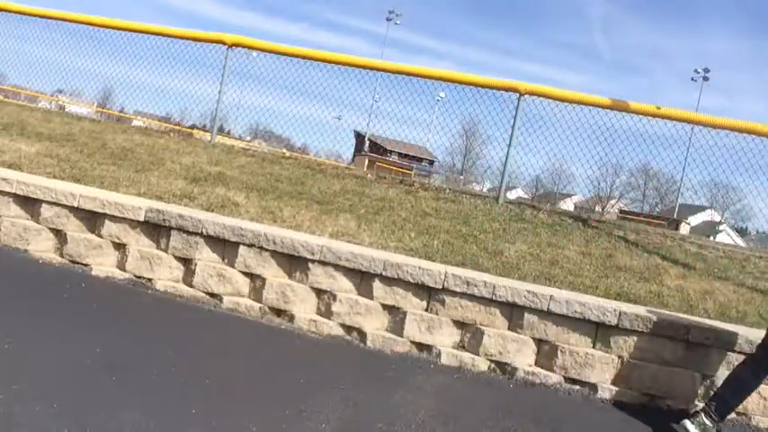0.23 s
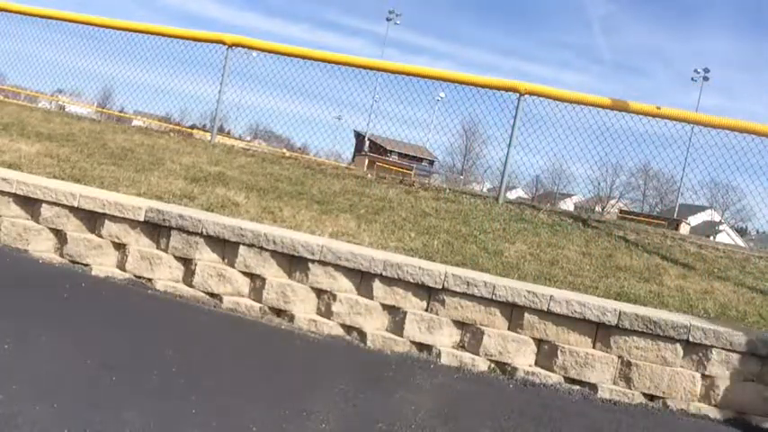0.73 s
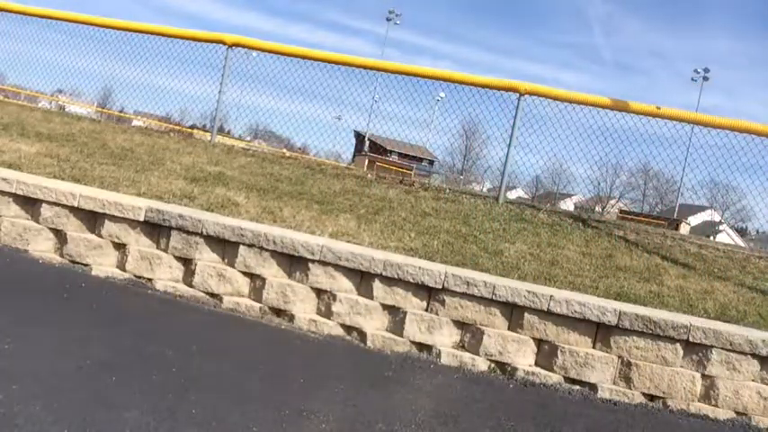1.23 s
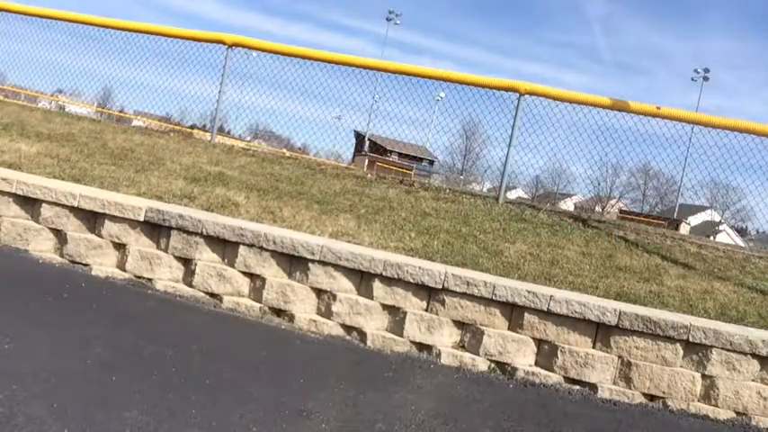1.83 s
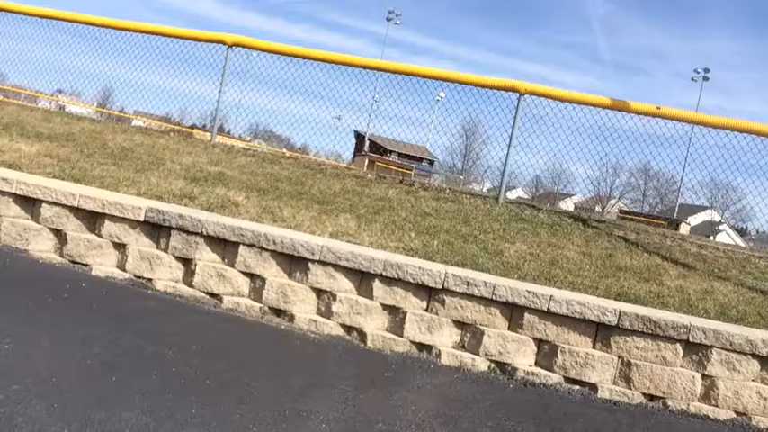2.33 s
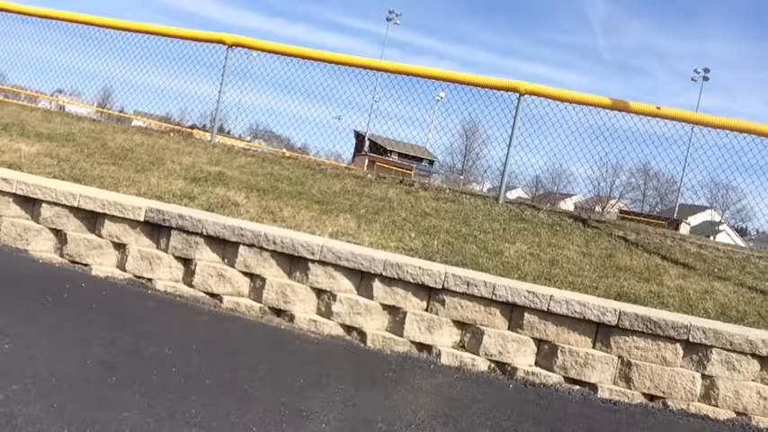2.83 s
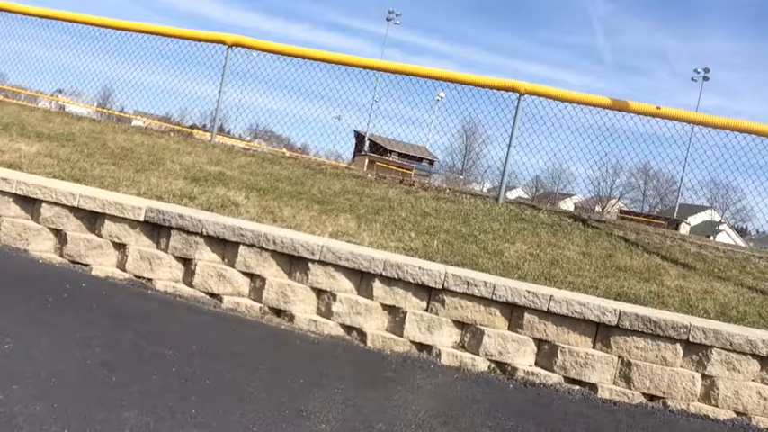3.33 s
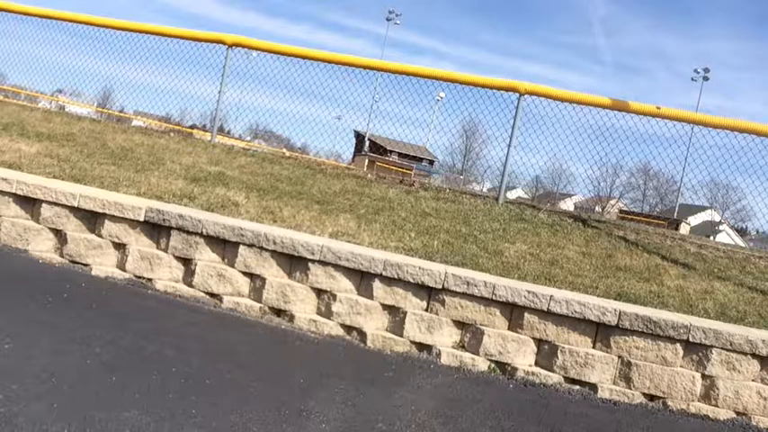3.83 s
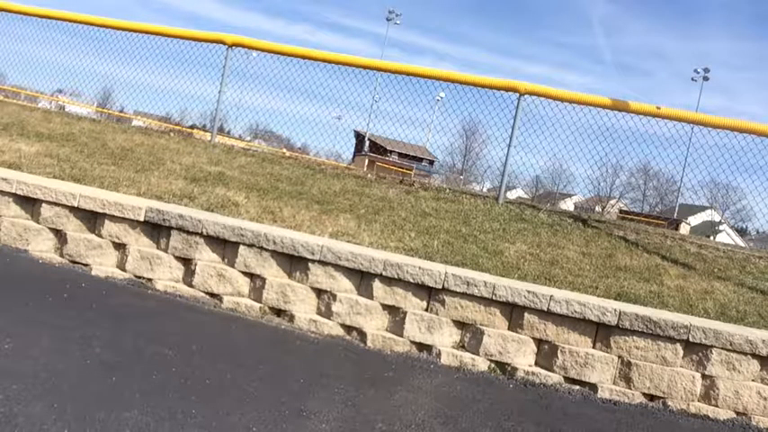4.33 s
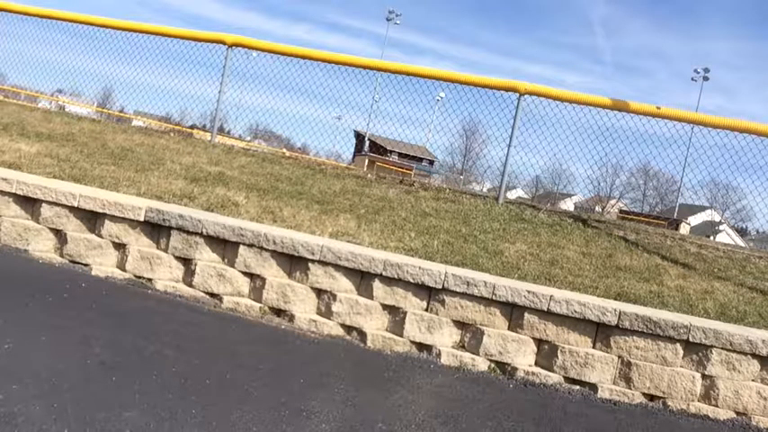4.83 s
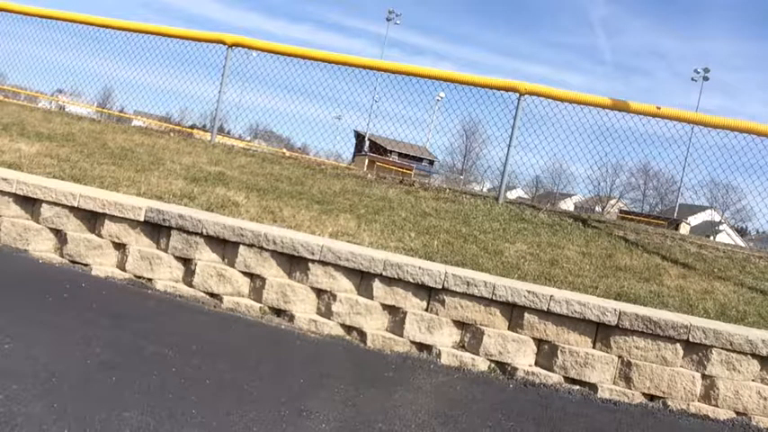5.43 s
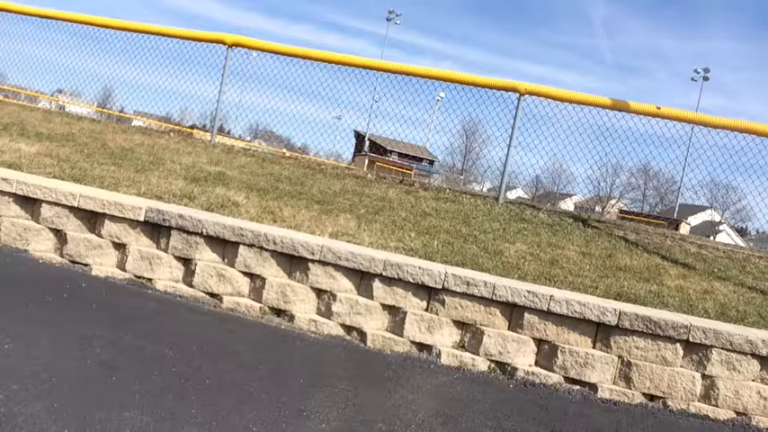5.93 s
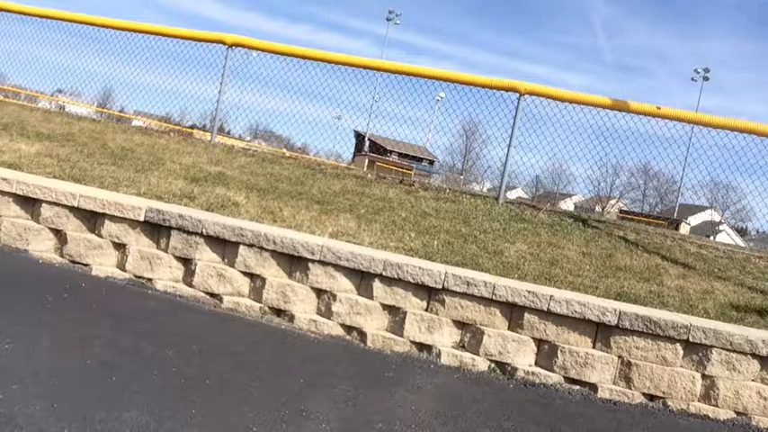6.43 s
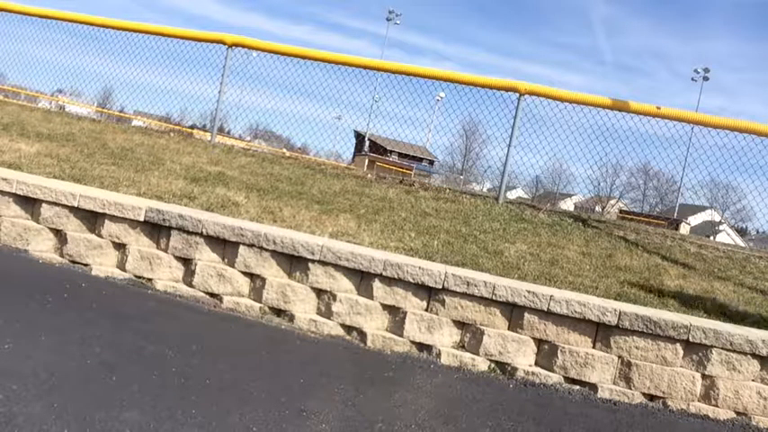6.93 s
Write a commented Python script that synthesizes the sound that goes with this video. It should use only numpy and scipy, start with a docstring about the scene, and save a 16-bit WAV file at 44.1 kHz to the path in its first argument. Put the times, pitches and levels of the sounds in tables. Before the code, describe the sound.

A kick scooter rolls softly past on rough asphalt with a faint whirr and a few ticks. Its deck then smacks down nearby, loud and sharp with a short metallic ring, bouncing and briefly skidding. Light knocks and jingling loose parts follow further off. Wind rumbles on the small microphone throughout, with frequent low pops after the smack, over faint outdoor hiss and distant traffic.

```python
"""Wind rumbles on a small microphone over faint outdoor hiss and far traffic as a kick scooter rolls past.
Stones in the asphalt drum its frame and stir a whirr. The deck smacks down nearby, ringing with the tube,
bounces and skids; light knocks and jingling loose parts follow further off, with faint echoes.
Eddies buffet the microphone with low pops. A faint far whine comes and goes near the end."""
import sys
import numpy as np
from scipy import signal
from scipy.fft import rfft, irfft
from scipy.io import wavfile
from scipy.ndimage import uniform_filter1d

SR = 44100
rng = np.random.default_rng(int(sys.argv[2]) if len(sys.argv) > 2 else 0)


def store_wav(level_fs):
    """Save 16-bit WAV to argv[1]."""
    pcm = np.round(np.clip(np.atleast_2d(level_fs), -1, 1) * 32767)
    wavfile.write(sys.argv[1], SR, pcm.T.astype(np.int16))


N = 317079


def gain_of(db):
    return 10 ** (np.asarray(db) / 20)

def decay(t, t60_s):
    return gain_of(-60 * t / t60_s)

def unit_rms(x):
    return x / np.sqrt(np.mean(x ** 2) + 1e-20)

def unit_peak(x):
    return x / (abs(x).max() + 1e-12)

def add(mix, start_s, sound):
    part = mix[round(start_s * SR):][:len(sound)]
    part += sound[:len(part)]

def curves(rows):
    """Each column after time_s, read at every sample."""
    time_s, *columns = np.transpose(rows)
    return [np.interp(np.arange(N) / SR, time_s, column) for column in columns]

def coloured(x, spectrum):
    """Signal shaped by (freq_hz, gain_db) points, rms 1."""
    bins_hz = np.fft.rfftfreq(len(x), 1 / SR)
    freq_hz, gain_db = np.transpose(spectrum)
    shape_db = np.interp(np.log(bins_hz + 1), np.log(freq_hz + 1), gain_db)
    return unit_rms(irfft(rfft(x) * gain_of(shape_db), len(x)))

def resonate(x, centre_hz, width_hz):
    pole = np.exp((2j * centre_hz - width_hz) * np.pi / SR)
    return 2 * signal.lfilter([1 - abs(pole)], [1, -pole], x).real

def wander(span_s):
    """Noise smoothed over span_s, rms 1."""
    size = max(round(span_s * SR), 2)
    return unit_rms(uniform_filter1d(uniform_filter1d(rng.standard_normal(N), size), size))

def swells(peak_s, peak_db, rise_db_per_s, fall_db_per_s):
    """Summed envelopes that climb and drop at steady dB rates."""
    t = np.arange(0, N + 128, 64) / SR
    late_s = t[:, None] - np.asarray(peak_s)
    slopes_db = np.minimum(rise_db_per_s * late_s, -fall_db_per_s * late_s)
    return np.interp(np.arange(N) / SR, t, gain_of(peak_db + slopes_db).sum(axis=1))


# time_s, low_db, upper_db
WIND_LEVELS = [(0, -50.5, -65.5), (.1, -64, -100), (.33, -48.5, -64), (.5, -59, -79.5), (1.15, -58, -76.5),
               (1.8, -56, -86.5), (2.0, -42, -61.5), (2.14, -46.5, -62.5), (2.45, -52, -69),
               (2.7, -66, -90), (2.77, -69, -105), (2.9, -42.5, -46), (3.12, -53, -46), (3.17, -52.5, -77),
               (3.55, -42.5, -46.5), (3.72, -52.5, -87), (4.1, -42.5, -56), (4.2, -82, -85.5),
               (4.5, -48.5, -77), (4.8, -53.5, -80), (5.0, -44, -49), (5.22, -50, -68.5),
               (5.66, -52.5, -89.5), (5.9, -41, -51), (6.03, -61, -66.5), (6.27, -45, -64.5),
               (6.38, -50.5, -51.5), (6.5, -58.5, -81), (6.65, -51, -66), (7.19, -54, -72.5)]
# freq_hz, gain_db
WIND_LOW_SPECTRUM = [(20, -42.5), (40, -8), (60, 1), (123, 1), (226, -5), (343, -22), (500, -38),
                     (1500, -120)]
WIND_UPPER_SPECTRUM = [(120, -45), (220, 1), (290, -1.5), (400, -5), (550, -17), (750, -38.5), (1000, -55),
                       (2500, -130)]
# time_s, pop_db, pop_hz, edge_rel_db, swell_low_db, swell_upper_db
BUFFETS = [(1.135, -38.5, 96, -41, -67, -83), (2.182, -41, 230, -4, -46, -64),
           (2.411, -29.5, 231, -38.5, -77, -56.5), (2.571, -25, 157, -41, -48, -52),
           (2.648, -25.5, 148.5, -33, -39, -50.5), (2.789, -33.5, 130.8, -29, -49.5, -72),
           (2.9, -39, 214, -1, -47, -51.5), (3.005, -17, 218, -19.5, -62.5, -41.5),
           (3.017, -27.5, 237.6, -12, -62, -68), (3.065, -31, 248, -14.5, -55, -59),
           (3.091, -42.5, 137, -1, -50.5, -55.5), (3.12, -23.5, 143, -40.5, -63, -72.5),
           (3.223, -31.5, 249, -11, -50, -44), (3.25, -28.5, 254, -19, -46.5, -39.5),
           (3.285, -18.5, 193, -23.5, -56.5, -45.5), (3.338, -36.5, 233, -12, -59, -44.5),
           (3.447, -17.5, 146.2, -30.5, -46.5, -49), (3.488, -34.5, 221.5, -10, -58, -46.5),
           (3.674, -21, 152, -31.5, -41.5, -49), (3.764, -17.5, 234.4, -24.5, -41.5, -38),
           (3.872, -26, 233, -18, -43, -47.5), (3.925, -25.5, 150.4, -40, -44.5, -49.5),
           (4.237, -33, 121.7, -41.5, -48, -66.5), (4.265, -37, 129, -39.5, -55, -69),
           (4.41, -27.5, 131.7, -48, -43.5, -55.5), (4.545, -27.5, 168.5, -35, -55.5, -48.5),
           (4.734, -33, 169.4, -46.5, -62, -69), (4.887, -26, 182, -51.5, -57, -76.5),
           (4.939, -29, 123, -29, -33.5, -72), (4.979, -33.5, 149, -18, -50, -63),
           (5.011, -26, 222, -23, -48, -45), (5.12, -25.5, 150, -48, -40.5, -56),
           (5.29, -47, 156.7, -25.5, -48, -52), (5.517, -28.5, 123, -36, -38.5, -39.5),
           (5.582, -13, 142.5, -16, -44, -33.5), (5.717, -25, 169.6, -18, -42, -34),
           (5.957, -30, 122, -16, -34, -50), (6.077, -29.5, 170, -28.5, -41, -47),
           (6.154, -21, 217, -25.5, -52, -52), (6.185, -20.5, 125, -25, -41, -42),
           (6.258, -30.5, 192.6, -14, -47, -41), (6.305, -31, 235, -18.5, -48, -37),
           (6.44, -33.5, 166, -32, -69, -80), (6.584, -35.5, 203, -22, -47.5, -55.5),
           (6.635, -29, 147.5, -19.5, -60.5, -49.5), (6.738, -43, 166.3, -20.5, -39, -47),
           (6.826, -26, 188, -37.5, -54.5, -67), (6.949, -41.5, 173, -28.5, -43.5, -59),
           (7.051, -23.5, 221.3, -15.5, -43, -35.5)]

def wind():
    """Eddies shake two bands of rumble together; some burst as pops inside a short swell."""
    low_db, upper_db = curves(WIND_LEVELS)
    buffet_s, *_, swell_low_db, swell_upper_db = np.transpose(BUFFETS)
    peak_s = buffet_s + 0.01
    low_level = gain_of(low_db) + swells(peak_s, swell_low_db, rise_db_per_s=328, fall_db_per_s=397)
    upper_level = gain_of(upper_db) + swells(peak_s, swell_upper_db, rise_db_per_s=464, fall_db_per_s=608)
    eddies = np.minimum(wander(0.006), 1.5)
    puffs = np.minimum(wander(0.045), 1)
    low = coloured(rng.standard_normal(N), WIND_LOW_SPECTRUM) * low_level
    upper = coloured(rng.standard_normal(N), WIND_UPPER_SPECTRUM) * upper_level
    out = low * gain_of(2.5 * eddies + 3.2 * puffs) + upper * gain_of(6.4 * eddies + 3.6 * puffs)
    for time_s, pop_db, pop_hz, edge_rel_db, _, _ in BUFFETS:
        add(out, time_s + 0.0019, gain_of(pop_db) * pressure_pop(pop_hz, edge_rel_db))
    return out

def pressure_pop(pop_hz, edge_rel_db):
    """One eddy on the microphone: quick push, slower release, a brief sharp edge."""
    t = np.arange(round(6 * SR / pop_hz)) / SR
    cycles = pop_hz * t
    envelope = (cycles / 0.57) ** 2 * np.exp(2 - cycles / 0.32)
    push = 0.68 * envelope * np.sin(2 * np.pi * 1.21 * cycles ** 0.8 - 0.7)
    edge_level = gain_of(edge_rel_db) * np.exp(-((t - 0.7 / pop_hz) / 0.0039) ** 2)
    edge = edge_level * np.cos(2 * np.pi * 600 * (t - 0.837 / pop_hz))
    onset = np.sin(np.pi / 2 * np.minimum(cycles / 0.4, 1)) ** 2
    return -(push + edge) * onset


# freq_hz, gain_db
HISS_SPECTRUM = [(150, -25), (260, -2.5), (400, -18), (820, -18.5), (2760, -29.5), (7800, -32),
                 (8500, -35.5), (15000, -38.5)]
TRAFFIC_SPECTRUM = [(20, -25.5), (45, -0.5), (60, 6.5), (100, 3.5), (140, -18), (250, -26.5), (1000, -100)]

def hiss_and_traffic(hiss_db=-69.5, traffic_db=-58):
    """Far outdoor hiss and traffic rumble, both wavering slightly."""
    hiss = gain_of(hiss_db + 0.43 * wander(0.077)) * coloured(rng.standard_normal(N), HISS_SPECTRUM)
    traffic_level = gain_of(traffic_db + 1.4 * wander(0.04))
    return hiss + traffic_level * coloured(rng.standard_normal(N), TRAFFIC_SPECTRUM)


# time_s, drone_db, grit_db
ROLL_LEVELS = [(0, -75, -90), (.15, -73.5, -84), (.3, -62.5, -70.5), (.38, -57, -81), (.48, -66, -85),
               (.6, -72, -96), (.72, -86, -99), (.9, -72, -78.5), (.99, -84, -68), (1.03, -83, -80),
               (1.5, -77, -82)]
# centre_hz, width_hz, level_db
ROLL_RESONANCES = [(532, 48, 13.5), (637, 62, 12), (925, 140, 10.5), (1300, 69, -6), (1700, 230, -20.5),
                   (2440, 500, -33)]
# peak_s, level_db, pitch_hz
WHEEL_WHIRRS = [(0.37, -69.5, 1107), (0.537, -69, 1067), (0.672, -84, 1002)]

def wheels(stones_per_s=2500, sag_hz_per_s=418):
    """Stones under the wheels drum the frame's low resonances, hiss with grit and stir a narrow whirr."""
    t = np.arange(N) / SR
    drone_db, grit_db = curves(ROLL_LEVELS)
    sizes = gain_of(0.54 * np.minimum(rng.exponential(1, N), 4))
    stones = sizes * (rng.random(N) < stones_per_s / SR) * rng.standard_normal(N)
    drone = sum(gain_of(db) * unit_rms(resonate(stones, hz, width)) for hz, width, db in ROLL_RESONANCES)
    grit_spectrum = [(1500, -5), (2500, -1.5), (4500, -4.5), (15000, -15)]
    grit = coloured(rng.standard_normal(N) + 0.094 * unit_rms(stones), grit_spectrum)
    shake = (0.95 + 0.69 * unit_rms(resonate(stones, 0, 110))) * np.sqrt(2)
    out = gain_of(drone_db) * unit_rms(drone) + gain_of(grit_db) * grit
    for peak_s, level_db, pitch_hz in WHEEL_WHIRRS:
        phase = 2 * np.pi * np.cumsum(pitch_hz - sag_hz_per_s * abs(t - peak_s)) / SR
        out += swells(peak_s, level_db, rise_db_per_s=82, fall_db_per_s=113) * shake * np.sin(phase)
    end_s = ROLL_LEVELS[-1][0]
    return out * np.clip((end_s - t) / 0.11, 0, 1)


# pitch_hz, level_db, t60_s
FRAME_MODES = [(233, -4.5, 0.22), (338, 4, 0.038), (497, -3.5, 0.097), (665, -8, 0.11), (890.7, -13, 0.14),
               (1053, -5.5, 0.05), (1162, -8.5, 0.043), (1385, -4.5, 0.077), (1550, -16, 0.03),
               (1718, -7, 0.066), (2110, -10.5, 0.061), (2456, -8.5, 0.038), (2596, -17, 0.057),
               (3390, -12, .04), (3876, -13, 0.045), (5400, -21, 0.043), (6250, -19.5, 0.18),
               (6670, -20, 0.1), (8132, -22, 0.21), (10500, -26.5, 0.074), (12250, -17, 0.03),
               (14040, -22.5, 0.03)]

def frame_ring(blow, scatter, t60_scale, detune, spread_db):
    """Deck and tube modes, peak 1; where the blow lands scatters their pitch and strength."""
    t = np.arange(len(blow)) / SR
    modes = np.zeros(len(t))
    for (pitch_hz, level_db, t60_s), (level_draw, pitch_draw) in zip(FRAME_MODES, scatter.reshape(-1, 2)):
        envelope = gain_of(level_db + spread_db * level_draw) * decay(t, max(t60_scale * t60_s, 0.004))
        modes += envelope * np.sin(2 * np.pi * pitch_hz * (1 + detune * pitch_draw) * t)
    return unit_peak(signal.fftconvolve(blow, modes)[:len(blow)])


# start_s, knock_db, jingle_rel_db, centre_hz, t60_s
RATTLE_HITS = [(0.302, -51, -20, 1000, 0.027), (0.32, -56.5, -1, 1700, 0.11),
               (0.373, -50, -16, 3620, 0.033), (0.032, -60, -9, 2200, 0.027),
               (0.903, -49.5, -30, 720, 0.0085), (.82, -63, -25, 1300, .015),
               (1.068, -57.5, -8, 2240, 0.015), (1.165, -59, -8, 3700, 0.012),
               (1.641, -51, -15, 514, 0.029), (1.813, -44, -10.5, 3330, 0.17),
               (2.097, -54.5, -1.5, 2190, 0.042), (2.113, -48, -10.5, 1950, 0.045),
               (2.133, -45, -18, 1280, 0.035), (2.247, -49.5, -5, 1420, 0.077), (2.262, -47, 0, 3400, 0.11),
               (2.274, -43.5, -8.5, 1440, 0.035), (2.294, -53.5, -8, 3015, 0.027),
               (2.919, -59, -3, 1610, 0.036), (3.004, -63.5, 9, 2987, 0.09), (3.178, -58.5, 0, 4530, 0.062),
               (3.214, -58, 5.5, 2940, 0.17), (3.248, -49, 1.5, 1800, 0.079),
               (3.682, -58, -16.5, 3100, 0.024), (3.699, -54.5, -20.5, 1180, 0.045),
               (3.766, -49.5, -28, 1280, 0.0095), (4.226, -60, -20, 2170, 0.017),
               (4.587, -54.5, -12, 2022, 0.034), (4.62, -61.5, -5, 4000, 0.021),
               (4.701, -62.5, -16.5, 2060, 0.038), (4.920, -45, -14.5, 1093, 0.044),
               (4.921, -51.5, -12, 3700, 0.079), (4.930, -42, -32, 1640, 0.047),
               (4.942, -48.5, -20, 1100, 0.046), (5.117, -61, 0.5, 1794, 0.0305),
               (5.2, -67, 0.5, 6000, 0.022), (5.212, -56.5, -4, 3005, 0.021),
               (5.226, -61.5, 8.5, 4010, 0.0082), (5.252, -55.5, -18.5, 2297, 0.025),
               (5.905, -53.5, -3, 2540, 0.015), (5.925, -54.5, 1, 1980, 0.023),
               (5.94, -50.5, -2, 3980, 0.011), (5.947, -53.5, -4, 1285, 0.086),
               (6.028, -60, -8, 2210, 0.024), (6.199, -72, 10.5, 2985, 0.016), (6.455, -69, 5, 3990, .012),
               (7.003, -57.5, -1, 4520, 0.025), (6.713, -51.5, -12.5, 1260, 0.053),
               (6.788, -44, -7, 1180, 0.022), (6.902, -56, -9, 2060, 0.036),
               (7.013, -44.5, -21, 1284, 0.094)]

def rattles():
    """Light knocks: a puff of noise and the ringing frame, with loose parts jingling on top."""
    out, t = np.zeros(N), np.arange(4500) / SR
    low_cut = signal.butter(3, 500, "high", fs=SR, output="sos")
    treble = signal.butter(3, 4500, "high", fs=SR, output="sos")
    for start_s, knock_db, jingle_rel_db, centre_hz, t60_s in RATTLE_HITS:
        noise = rng.standard_normal(len(t))
        puff = noise * decay(t, t60_s) * np.minimum(t / 0.0014, 1)
        body = frame_ring(noise * decay(t, 0.006), noise[-2 * len(FRAME_MODES):],
                          t60_scale=min(t60_s / 0.11, 1), detune=0.006, spread_db=2.5)
        loose = frame_ring(noise * decay(t, 0.011), noise[-4 * len(FRAME_MODES):],
                           t60_scale=min(0.4 + t60_s / 0.12, 1), detune=0.008, spread_db=5)
        knock = resonate(puff + 2.6 * body, centre_hz, 0.55 * centre_hz)
        knock = signal.sosfilt(low_cut, resonate(knock, centre_hz, 0.9 * centre_hz))
        tick = unit_rms(signal.sosfilt(treble, resonate(puff, 6000, 6500)))
        ring_gain = 0.9 * min(t60_s / 0.05, 1)  # longer rattles ring more
        jingle = unit_peak(tick + ring_gain * unit_rms(signal.sosfilt(treble, loose)))
        add(out, start_s, gain_of(knock_db) * (unit_peak(knock) + gain_of(jingle_rel_db) * jingle))
    return out


# time_s, mid_db, treble_rel_db, bass_rel_db, t60_s
DECK_BLOWS = [(1.8365, -2.5, -10.5, -20.5, 0.027), (1.84, -7.5, -8.5, -4.5, 0.098),
              (1.873, -23.5, -26, 0, 0.029), (1.8962, -20, -18, -4.5, 0.075), (1.913, -32, 1.5, 3, 0.1),
              (1.9426, -37, 9.5, 11, 0.079), (2.159, -25, -26, -0.5, 0.068)]
# freq_hz, gain_db
CRACK_SPECTRUM = [(100, -19), (250, -5.5), (500, -3.5), (850, -13.5), (1400, -3.5), (2500, -14),
                  (4500, -19), (7000, -21.5), (10000, -27.5), (13000, -17.5), (16000, -37)]

def deck_smacks(treble_t60_s=0.65):
    """Hard blows: a crack of noise plus the ringing frame, three bands tilted by each blow's hardness."""
    out, t = np.zeros(N), np.arange(9000) / SR
    bands = [signal.butter(2, edges_hz, "band", fs=SR, output="sos")
             for edges_hz in ([150, 800], [800, 5000], [5000, 17000])]
    for time_s, mid_db, treble_rel_db, bass_rel_db, t60_s in DECK_BLOWS:
        noise = rng.standard_normal(len(t))
        fade = decay(t, 0.3 * t60_s) + 0.86 * decay(t, t60_s)
        crack = coloured(noise, CRACK_SPECTRUM) * fade * np.minimum(t / 0.00046, 1)
        blow = np.exp(-t / 0.00003) + 0.14 * noise * decay(t, 0.004)
        body = frame_ring(blow, noise[-2 * len(FRAME_MODES):],
                          t60_scale=min(t60_s / 0.065, 1), detune=0.002, spread_db=1.8)
        bass, mid, treble = (signal.sosfilt(band, body + 0.3 * crack) for band in bands)
        bass = gain_of(bass_rel_db) * unit_peak(bass)
        treble = gain_of(treble_rel_db) * unit_peak(treble * decay(t, treble_t60_s))
        smack = unit_peak(mid) - bass - treble  # signs join the bands without gaps
        add(out, time_s - 0.0006, gain_of(mid_db) * smack * np.minimum(t / 0.00091, 1))
    return out


# start_s, length_s, level_db, centre_hz, width_hz
SKID_STROKES = [(1.836, 0.15, -52.5, 4220, 9130), (2.137, 0.099, -62.5, 1780, 4000),
                (3.846, 0.1, -70.5, 3660, 2492), (5.876, 0.071, -68.5, 2370, 5000)]

def skids():
    """Rough friction noise that swells quickly and dies away."""
    out = np.zeros(N)
    friction = rng.standard_normal(N) * gain_of(2.5 * wander(0.004))
    for start_s, length_s, level_db, centre_hz, width_hz in SKID_STROKES:
        rub = friction[round(start_s * SR):][:round(length_s * SR)]
        rub = resonate(resonate(rub, centre_hz, width_hz), centre_hz, 1.499 * width_hz)
        add(out, start_s, gain_of(level_db) * unit_rms(rub) * signal.windows.tukey(len(rub), 0.7))
    return out


def far_whine(start_s=5.25, length_s=1.25, level_db=-86, centre_hz=1750, width_hz=150):
    """A narrow band of noise that fades in and out."""
    out, noise = np.zeros(N), rng.standard_normal(round(length_s * SR))
    band = resonate(resonate(noise, centre_hz, width_hz), centre_hz, width_hz)
    add(out, start_s, gain_of(level_db) * unit_rms(band) * signal.windows.tukey(len(band), 0.4))
    return out


def echoes(x, level_db=-23, delay_s=0.008, t60_s=0.22):
    """Faint scattered reflections from wall and ground."""
    t = np.arange(12000) / SR
    tail = resonate(rng.standard_normal(len(t)), 1100, 1500) * decay(t, t60_s) * (t > delay_s)
    return gain_of(level_db) * signal.fftconvolve(x, tail / np.linalg.norm(tail))[:N]


def scene():
    scooter = deck_smacks() + rattles() + skids()
    return (scooter + echoes(scooter) + wheels() + wind() + hiss_and_traffic() + far_whine())[None]


def record(dry, cutoff_hz=15400):
    """Low-pass band limit."""
    lowpass = signal.firwin(511, cutoff_hz, window=("kaiser", 9), fs=SR)
    return signal.oaconvolve(dry, lowpass[None], "same")


dry = scene()
out = record(dry)
store_wav(out)
```